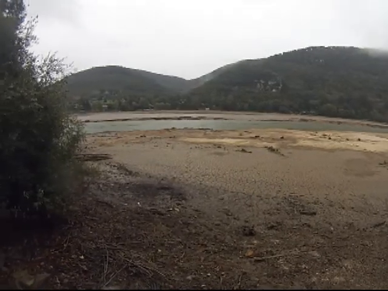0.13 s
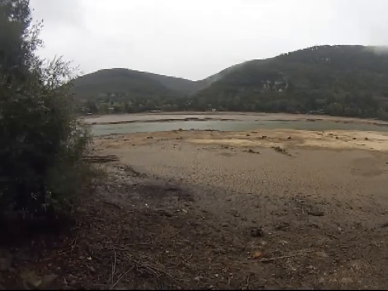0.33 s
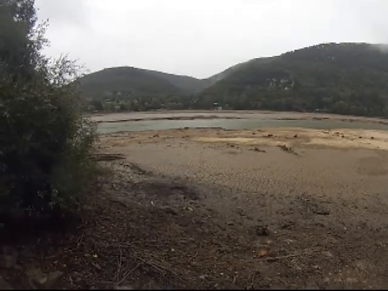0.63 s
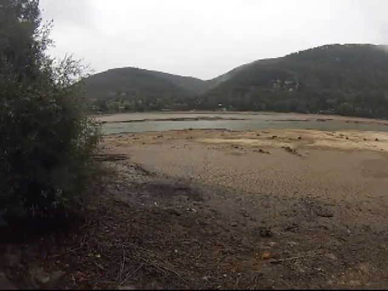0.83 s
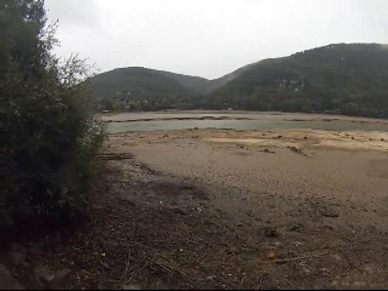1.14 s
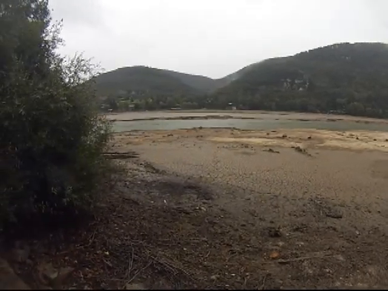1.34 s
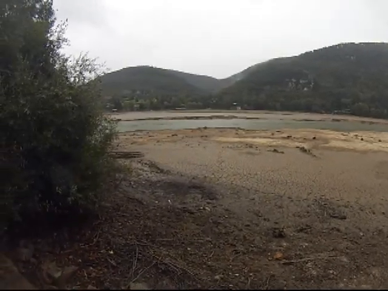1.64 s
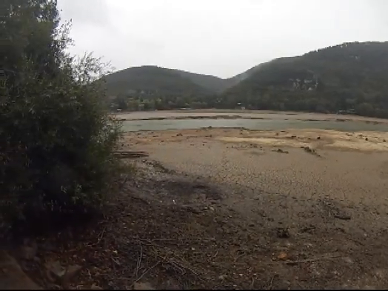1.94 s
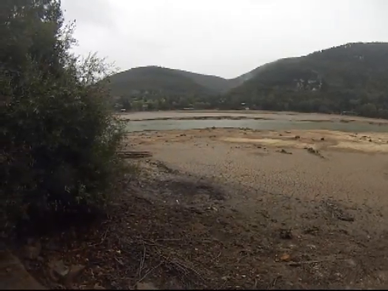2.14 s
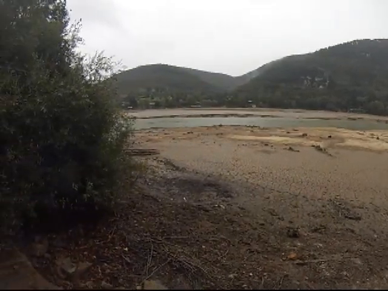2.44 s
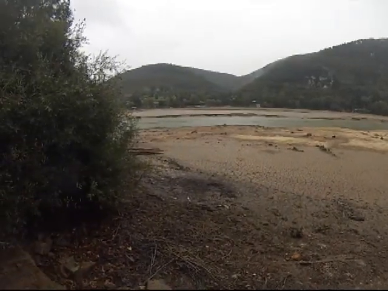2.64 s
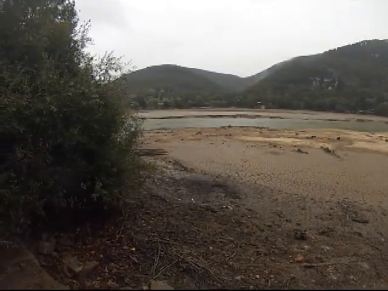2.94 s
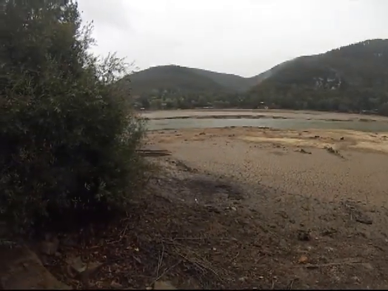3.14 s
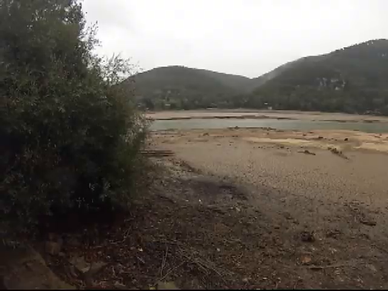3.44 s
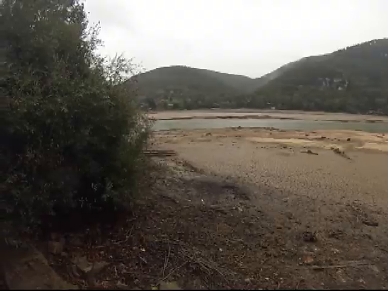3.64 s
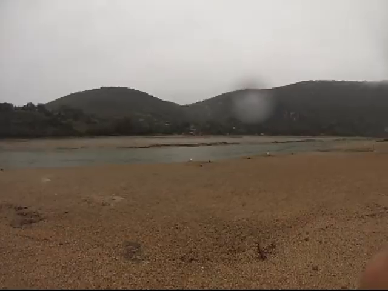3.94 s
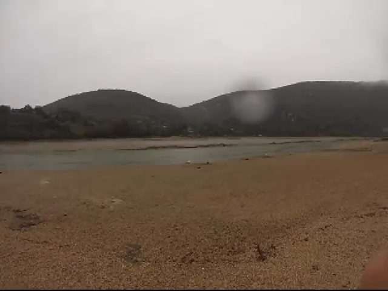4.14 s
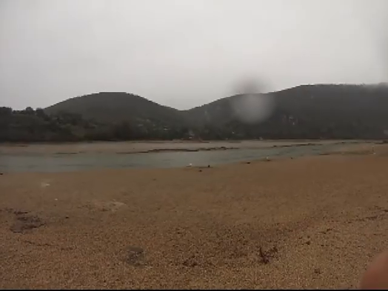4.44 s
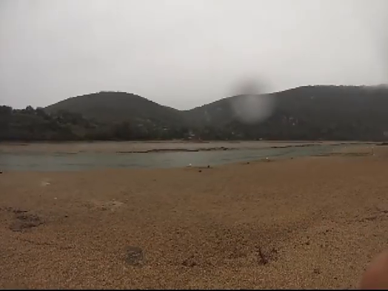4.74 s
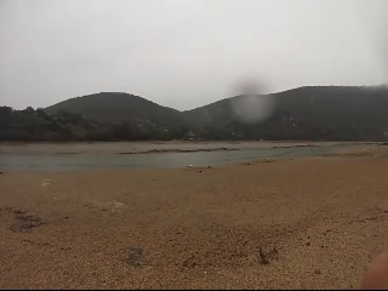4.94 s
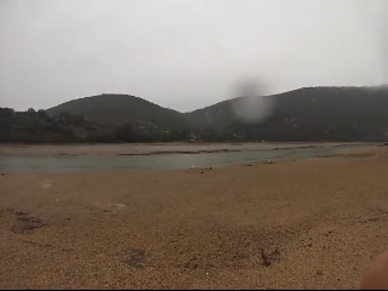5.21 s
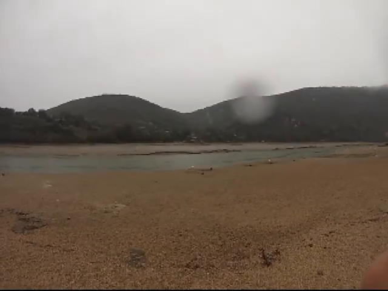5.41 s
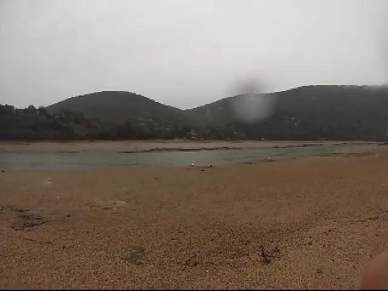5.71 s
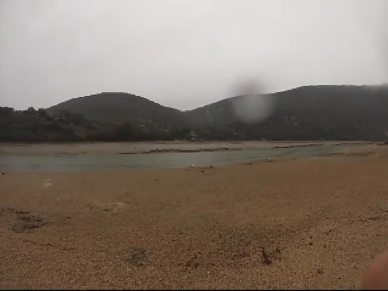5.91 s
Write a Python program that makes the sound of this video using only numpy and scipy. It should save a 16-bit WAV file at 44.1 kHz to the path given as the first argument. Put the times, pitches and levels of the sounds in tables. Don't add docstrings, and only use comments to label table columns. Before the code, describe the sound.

A microphone inside a plastic case hears rain at very close range: irregular dry clicks and dull knocks, mostly quiet, over a dim hiss and gentle rumble, with tiny droplets pattering. A few bumps nudge the case. After a momentary dropout about two thirds through, the patter is gone, low wind gusts push harder, and a loud drop leaves a thin metallic ring.

```python
import sys
import numpy as np
from scipy import signal
from scipy.fft import rfft, irfft, next_fast_len
from scipy.io import wavfile
from scipy.ndimage import uniform_filter1d

SR = 44100
rng = np.random.default_rng(int(sys.argv[2]) if len(sys.argv) > 2 else 0)


def store_pcm(level_fs):
    pcm = np.round(np.clip(level_fs, -1, 1) * 32767).astype(np.int16)
    wavfile.write(sys.argv[1], SR, np.atleast_2d(pcm).T)


def boost(x):
    u = np.asarray(x, float) / 20
    return 10 ** u


N = 267554

# (frequency [Hz], level [dB per Hz])
HISS_COLOUR = [(30, -5.5), (60, -6), (115, -11.5), (190, -12), (234, -15.5), (295, -15.5), (502, -19),
               (694, -20.5), (744, -21.5), (816, -21.5), (1030, -22.5), (2150, -26), (2710, -28),
               (5810, -34.5), (15000, -46.5)]
# (frequency [Hz], level [dB per Hz])
RUMBLE_COLOUR = [(7.1, -25), (12, 3), (22, 4), (34, -2), (52, -9), (76, -19), (120, -26), (160, -44),
                 (260, -120)]
# (time [s], rumble level [dB])
WIND_STRENGTH = [(0.0,-57.5), (0.3,-51.5), (0.83,-58), (1.7,-59.5), (2.5,-56.5), (3.4,-60), (3.7,-48),
                 (3.93,-48), (4.03,-35), (4.2,-48.5), (4.5,-36.5), (4.74,-49), (4.91,-42), (5.1,-44),
                 (5.3,-48), (5.55,-46.5), (5.88,-47), (6.07,-49)]
# (time [s], gain [dB])
SCENE_CHANGE = [(0, 0), (3.871, 0), (3.874, -14.5), (3.882, -3.5), (3.89, -71), (3.9, -68), (3.903, -63),
                (3.905, 0.5), (6.07, -0.5)]
# (frequency [Hz], level [dB per Hz])
SIDE_COLOUR = [(30, 14), (70, -9), (150, -1.5), (500, 5), (1600, 3), (3500, 4.5), (9500, -1.5), (9900, -7),
               (12600, -10), (13000, -60)]
# (start [s], end [s])
POOR_TREBLE = [
    (3.95, 3.978),
    (3.995, 4.052),
]
# (time [s], level [dB], frequency [Hz], 60 dB decay [s], swell [ms])
BUMPS = [
    (1.122, -50, 150, 0.058, 1.6),
    (1.614, -41.5, 260, 0.034, 0.53),
    (2.284, -26, 200, 0.0074, 0.33),
    (2.9186, -22, 93, 0.0396, 9.2),
    (2.921, -31.5, 217.5, 0.035, 2.1),
    (2.9185, -43, 690, 0.011, .6),
    (2.9188, -35, 1300, 0.015, 0.68),
    (2.921, -56, 4950, 0.0193, .5),
    (6.0578, -45, 4280, 0.012, .3),
    (6.0252, -48, 1275, 0.0203, .4),
]
# (time [s], level [dB], 60 dB decay [s], low edge [Hz], high edge [Hz])
SPLASHES = [
    (2.9187, -42.5, 0.033, 403, 2230),
    (2.9232, -50, 0.018, 1800, 2460),
    (2.9215, -59, 0.0172, 4000, 14000),
    (3.985, -66, 0.028, 6000, 16000),
    (4.06, -62, 0.15, 9000, 15500),
    (4.062, -50, .06, 1000, 6000),
    (5.58, -57, 0.015, 2000, 7900),
    (6.0572, -48, 0.013, 3920, 4470),
]
# (frequency [Hz], level [dB], 60 dB decay [s])
LATCH = [(2514, -1.5, .12), (3553, -9.5, .55)]
# (frequency [Hz], level [dB], 60 dB decay [s])
FRAME = [(4027, -3, .18), (4199, 0, .14), (4538, -9, .27), (1518, -17, .08), (5530, -15, .1),
         (7100, -19, .08)]
# (frequency [Hz], width [Hz], level [dB])
TOP_PANEL = [(1220, 120, -41.5), (1430, 163, -42.5), (2040, 175, -27), (2900, 120, -53.0), (3370, 130, -49),
             (5640, 380, -46.5), (11340, 1500, -44.5)]
# (frequency [Hz], width [Hz], level [dB])
LID = [(1241, 180, -25), (1423, 580, -19.5), (2040, 184, -21), (2660, 115, -36), (3440, 202, -31),
       (4170, 82, -41), (5250, 740, -27), (6680, 237, -32.5), (7640, 650, -24), (10160, 190, -45),
       (11800, 980, -31.5)]
# (frequency [Hz], width [Hz], level [dB])
DOOR = [(663, 410, -10.5), (1282, 210, -6), (2130, 367, 5.5), (3130, 300, -9.5), (3460, 200, -21),
        (3876, 370, -2.5), (4350, 210, -24), (4670, 150, -40), (5400, 250, -25), (5850, 350, -20),
        (6740, 730, -21), (7700, 202, -29), (10700, 1600, -8.5)]
# (frequency [Hz], width [Hz], level [dB])
FLANK = [(1246, 100, -33.5), (1600, 335, -34), (2210, 130, -30.5), (3149, 310, -24.5), (3330, 140, -30.5),
         (4265, 190, -33), (5220, 340, -27), (5980, 1400, -23), (8340, 440, -38), (9260, 520, -40),
         (11900, 350, -44)]
# (frequency [Hz], width [Hz], level [dB])
WINDOW = [(655, 120, -49.5), (1204, 124, -16.5), (1520, 134, -18.5), (2080, 82, -18), (2660, 250, -11),
          (3300, 320, -9.5), (3640, 224, -30), (3980, 220, -14.5), (4310, 170, -13.5), (5240, 110, -27.5),
          (5800, 390, -25), (6600, 940, -18.5), (7970, 260, -41), (10650, 440, -34.0)]
# (time [s], contact build-up [ms], latch ring [dB], frame ring [dB])
LOUD_DROPS = [
    (1.1813, 0.234, -78, -78),
    (1.2712, .04, -66, -80.5),
    (2.2849, 2.4, -57, -65),
    (4.059, 0.044, -58.5, -71.5),
    (5.061, 0.043, -47.5, -40.5),
]
# (frequency [Hz], width [Hz], level [dB])
SHELL = [
    [(2168, 103, -1.5)],
    [(1200, 160, -32), (1477, 210, 2.5)],
    [(2600, 220, -10), (3200, 310, 8.5)],
    [(4180, 230, -3), (5040, 270, 0)],
    [(7100, 420, 5.5), (10800, 900, 2.5)],
]
HARD_SHARE = [-1.5, 0.5, -4.5]
# (time [s], strength [dB], spot: 2 kHz over low tones [dB], hardness: higher tones [dB])
LIGHT_DROPS = [(0.2044, -55, 6.5, -10), (0.2187, -47, -5, -23), (0.2557, -49, 17, -21),
               (0.4047, -52, 2.5, -20), (0.5324, -63, 2.5, -7), (0.548, -58, 8, -12),
               (0.8032, -45, -21, -27), (0.8313, -45.5, -9, -27.5), (1.126, -46, -5.5, -18),
               (1.506, -53, -14.5, -14), (1.6955, -66, -10.5, -6), (1.7868, -52, 4, -7),
               (1.8044, -68, -1.5, 11), (1.9823, -48, 9.5, -25.5), (2.663, -47.5, 18, -15.5),
               (2.7223, -50.5, 16, -19), (2.921, -52, 4, -14.5), (3.1747, -49.5, -1.3, -18),
               (3.5918, -52, -18, -15), (3.9864, -63.5, .3, -2.5), (4.0952, -38.5, 2, -13),
               (4.2466, -38, -12, -25), (4.7626, -47.5, 19, -23), (5.5802, -53, 3, -6),
               (5.685, -50.5, 16.5, -18), (6.026, -58, -10.5, -4), (6.0579, -44, 9, -15)]


def in_time(rows):
    s, *columns = np.transpose(rows)
    return [np.interp(np.arange(N) / SR, s, column) for column in columns]


def coloured(points):
    hz, db = np.transpose(points)
    size = next_fast_len(N)
    log_hz = np.log(np.fft.rfftfreq(size, 1 / SR) + 1)
    colour = boost(np.interp(log_hz, np.log(hz), db, left=-60, right=-90))
    noise = irfft(rfft(rng.standard_normal(size)) * colour, size)[:N]
    return noise / noise.std()


def add(track, s, sound):
    at = int(s * SR)
    track[at:at + len(sound)] += sound[:N - at]


def rain_hiss():
    return boost(-57.5) * coloured(HISS_COLOUR)


def evened(x):
    span_s = 0.17
    x = x / x.std()
    power = uniform_filter1d(x ** 2, int(span_s * SR))
    x = x / (power + .05) ** 0.43
    return x / x.std()


def wind():
    deep_db, = in_time(WIND_STRENGTH)
    noise = coloured(RUMBLE_COLOUR)
    deep = signal.sosfiltfilt(signal.butter(3, 56, fs=SR, output="sos"), noise)
    calm_db, share_of_gust = -57.5, 0.56
    upper_db = -66 + share_of_gust * (deep_db - calm_db)
    return boost(deep_db) * evened(deep) + boost(upper_db) * evened(noise - deep)


def knock(modes, rise_ms):
    hz, width, db = np.transpose(modes)[:, :, None]
    t = np.arange(SR // 25) / SR
    tones = boost(db) * np.exp(-np.pi * width * t) * np.sin(2 * np.pi * hz * t)
    signs = (-1.) ** np.arange(len(modes))
    body = signs @ tones * (1 - np.exp(-1000 * t / rise_ms))
    body = body * np.exp(-(t / 0.008) ** 2)
    return signal.sosfilt(signal.butter(2, 600, "high", fs=SR, output="sos"), body)


def patter(per_s, level_db):
    out = 0
    for modes in SHELL[:2]:
        sizes = boost(level_db + 2.8 * np.minimum(rng.exponential(1, N), 3))
        sizes = sizes * rng.choice([-1, 1], N)
        hits = sizes * (rng.random(N) < per_s / SR)
        out = out + signal.oaconvolve(hits, knock(modes, rise_ms=.2))[:N]
    return out * (np.arange(N) < SCENE_CHANGE[2][0] * SR)


def bumps():
    t, out = np.arange(SR // 5) / SR, np.zeros(N)
    for s, db, hz, t60, swell_ms in BUMPS:
        swell_and_decay = boost(db - 60 * t / t60) * (1 - np.exp(-1000 * t / swell_ms))
        add(out, s, -swell_and_decay * np.sin(2 * np.pi * hz * t))
    return out


def splashes():
    t, out = np.arange(SR // 5) / SR, np.zeros(N)
    for s, db, t60, low_hz, high_hz in SPLASHES:
        band = signal.butter(2, [low_hz, high_hz], "band", fs=SR, output="sos")
        noise = signal.sosfilt(band, rng.standard_normal(len(t)))
        add(out, s, boost(db - 60 * t / t60) * noise / noise.std())
    return out


def metal_ring(part):
    t = np.arange(SR // 2) / SR
    tones = sum(boost(db - 60 * t / t60) * np.sin(2 * np.pi * hz * t) for hz, db, t60 in part)
    return tones * (1 - np.exp(-t / 0.00054))


def loud_drops():
    out = np.zeros(N)
    latch, frame = metal_ring(LATCH), metal_ring(FRAME)
    panels = (TOP_PANEL, LID, DOOR, FLANK, WINDOW)
    for (s, rise_ms, latch_db, frame_db), panel in zip(LOUD_DROPS, panels):
        add(out, s, knock(panel, rise_ms))
        add(out, s, boost(latch_db) * latch + boost(frame_db) * frame)
    top_limit = signal.butter(6, 13600, fs=SR, output="sos")
    return signal.sosfilt(top_limit, out + 1e-18)


def light_drops():
    groups = np.array([knock(modes, rise_ms=0.13) for modes in SHELL])
    out = np.zeros(N)
    for s, db, spot_db, hard_db in LIGHT_DROPS:
        group_db = db + np.r_[min(spot_db, 0), min(-spot_db, 0), hard_db + np.array(HARD_SHARE)]
        add(out, s - .0003, boost(group_db) @ groups)
    return out


def scene():
    background = rain_hiss() + wind()
    rain = patter(per_s=35, level_db=-62) + splashes() + loud_drops() + light_drops()
    gain = boost(in_time(SCENE_CHANGE)[0])
    return np.tile((background + bumps() + rain) * gain, (2, 1))


def thin_top(x, keep, slope, loud_db):
    hz, t, cells = signal.stft(x, SR, nperseg=2048)
    band = np.maximum((hz - 12000) // 170 + 1, 0).astype(int)
    shared = signal.lfilter([.45], [1, -.5], rng.standard_normal(len(t)))
    shared = shared - 9 * sum((t > start) & (t < end) for start, end in POOR_TREBLE)
    own = rng.standard_normal((band.max() + 1, len(t)))
    own = signal.lfilter([.85], [1, -.5], own)
    odds = shared + own + keep - slope * np.arange(band.max() + 1)[:, None]
    loud = uniform_filter1d(np.abs(cells), size=21, axis=0) > boost(loud_db)
    kept = (odds[band] > 0) | (band[:, None] == 0) | loud
    kept = kept * (hz[:, None] < 15100)
    return signal.istft(cells * kept, SR, nperseg=2048)[1][:N]


def band_limit(x):
    return signal.sosfilt(signal.butter(12, 15120, fs=SR, output="sos"), x)


def record(dry):
    mono = thin_top(dry[0], keep=0.98, slope=0.08, loud_db=-104)
    side = boost(-77.5 + in_time(SCENE_CHANGE)[0]) * coloured(SIDE_COLOUR)
    return band_limit(mono + side * [[1], [-1]])


dry = scene()
out = record(dry)
store_pcm(out)
```